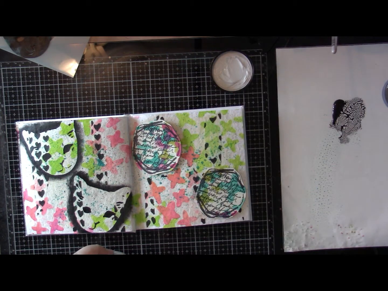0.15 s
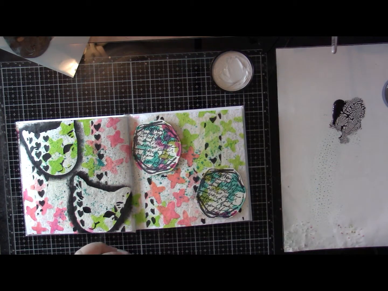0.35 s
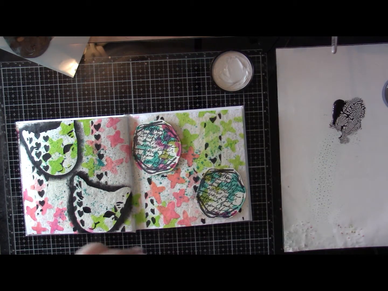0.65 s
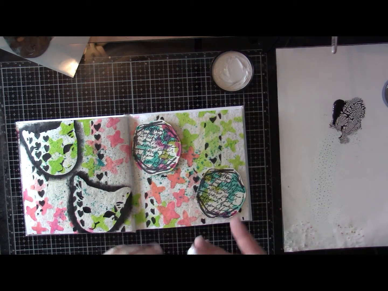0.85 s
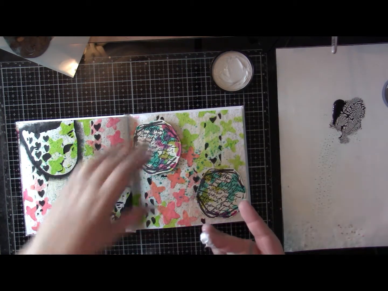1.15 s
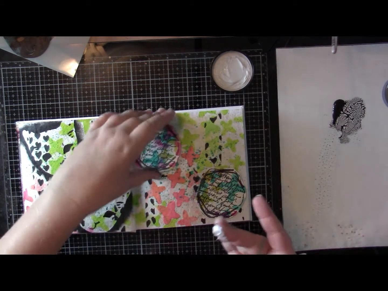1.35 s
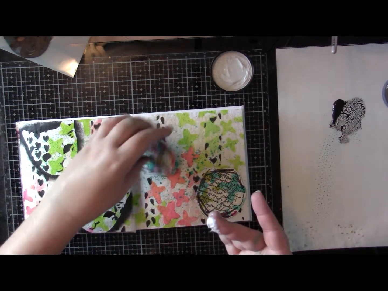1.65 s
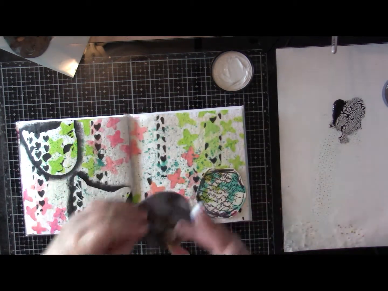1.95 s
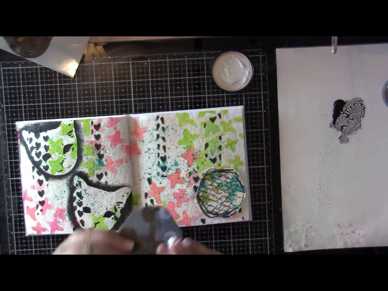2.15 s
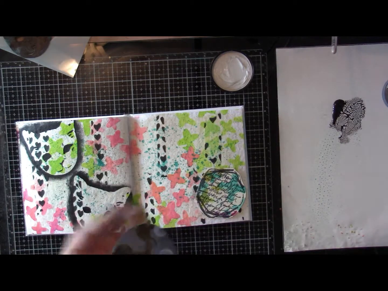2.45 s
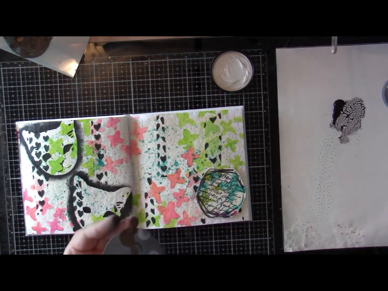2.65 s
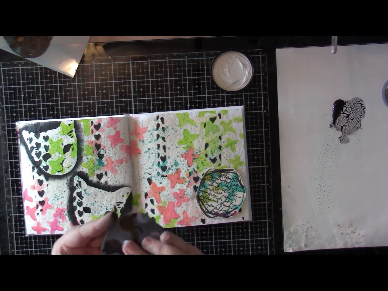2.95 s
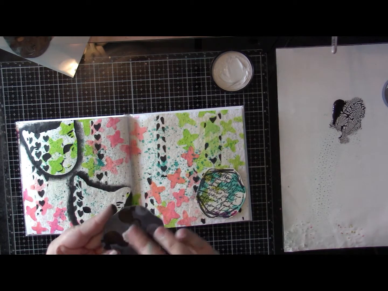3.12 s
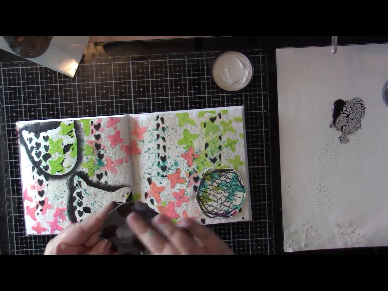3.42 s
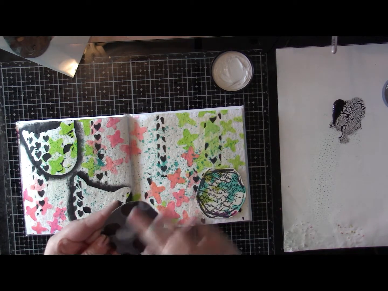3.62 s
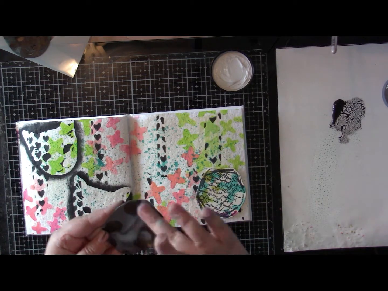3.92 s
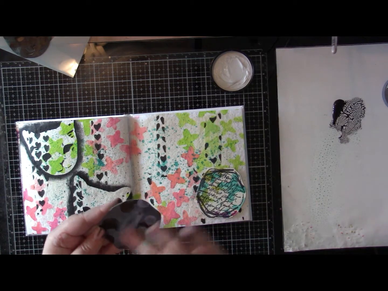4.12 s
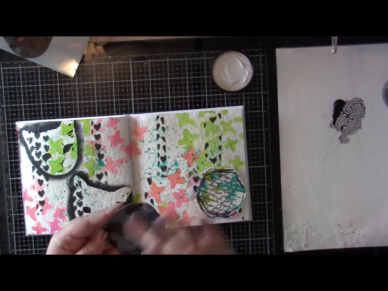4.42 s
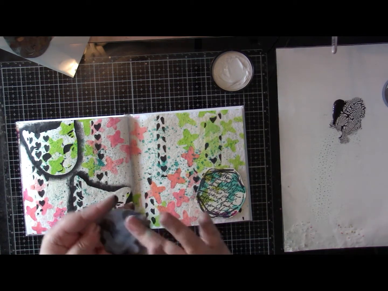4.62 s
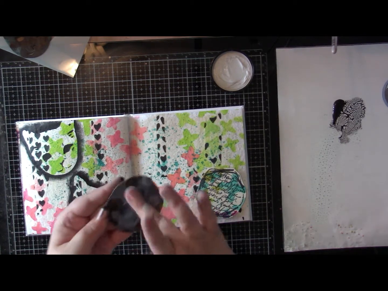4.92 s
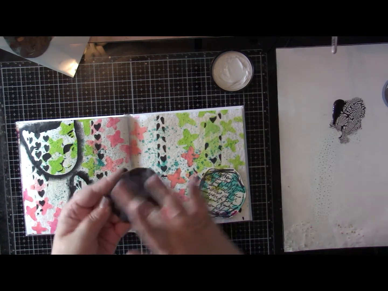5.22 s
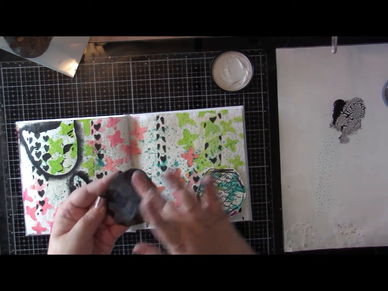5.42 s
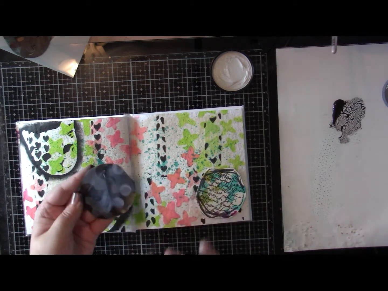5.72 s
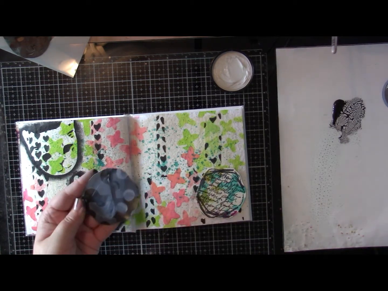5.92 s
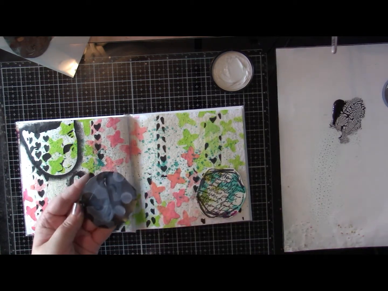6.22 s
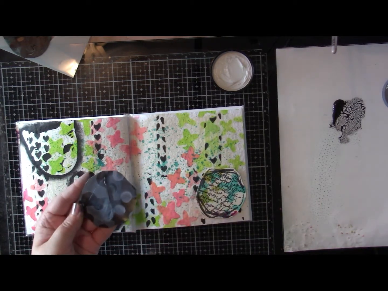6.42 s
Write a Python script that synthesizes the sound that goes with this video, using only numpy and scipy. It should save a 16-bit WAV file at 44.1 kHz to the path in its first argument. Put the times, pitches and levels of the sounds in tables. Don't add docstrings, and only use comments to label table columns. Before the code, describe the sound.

Close up at an indoor craft table: a faint click, two woody knocks with a light rattle, then the dry sticky crackle of card pulled from paper. A low page bump follows, with small ticks and soft papery scuffing. The disc pops loudly four times as it flexes under rubbing fingers. Handling fades to quiet room air before a dull final thump.

```python
import sys
import numpy as np
from scipy import signal
from scipy.fft import rfft, irfft
from scipy.io import wavfile

SR = 44100
rng = np.random.default_rng(int(sys.argv[2]) if len(sys.argv) > 2 else 0)


def wrap_up_sound(samples):
    columns = np.atleast_2d(samples).T
    tamed = np.clip(columns, -1, 1)
    steps = np.round(tamed * 32767).astype(np.int16)
    wavfile.write(sys.argv[1], SR, steps)


def elevation(decibels):
    levels = np.asarray(decibels, float)
    return 10 ** (levels / 20)


N = 289296

# (frequency [Hz], level [dB])
ROOM_COLOUR = [(150, -19), (400, -6), (750, 2), (1500, -1.5), (3000, -3.5), (6000, -2.5), (14000, -9)]


def at_hz(points, hz):
    table_hz, table_db = np.array(points)[:, 0], np.array(points)[:, 1]
    return np.interp(np.log(hz + 1), np.log(table_hz), table_db)


def rms_one(x):
    return x / np.sqrt(np.mean(x ** 2) + 1e-20)


def band(x, low_hz, high_hz):
    return signal.sosfilt(signal.butter(2, [low_hz, high_hz], "band", fs=SR, output="sos"), x)


def coloured(x, db_of):
    return irfft(rfft(x) * elevation(db_of(np.fft.rfftfreq(N, 1 / SR))), N)


def resonance(x, hz, width_hz):
    r = np.exp(-np.pi * width_hz / SR)
    poles = [1, -2 * r * np.cos(2 * np.pi * hz / SR), r * r]
    return signal.lfilter(np.array([1, 0, -1]) * (1 - r * r) / 2, poles, x)


def drift(rate_hz):
    r = np.exp(-2 * np.pi * rate_hz / SR)
    chance = rng.standard_normal(N + SR)
    return rms_one(signal.lfilter([1], [1, -2 * r, r * r], chance)[SR:])


def grains(per_s, spread_db):
    sizes = elevation(spread_db * np.minimum(rng.exponential(1, N), 5)) * rng.choice([-1, 1], N)
    return sizes * (rng.random(N) < per_s / SR) + 1e-18


def swell(t, rise_s):
    return (t / rise_s * np.exp(1 - t / rise_s)) ** 2


def add(out, s, sound):
    i = round(s * SR)
    out[i:i + len(sound)] += sound[:N - i]


def hush():
    # (frequency [Hz], level [dB per Hz])
    air_spectrum = [(18, -64.5), (30, -30), (59, -9), (131, -7.5), (161, -4.5), (355, -3), (473, -2),
                    (512, -7), (584, -5.5), (913, -12.5), (1670, -19.5), (2750, -21.5), (7000, -29),
                    (12000, -34.5), (14000, -40), (16000, -45)]
    # (time [s], level [dB])
    air_levels = [(0, -59.5), (1.06, -56.5), (2.76, -58), (3.84, -56.5), (4.0, -58.5), (6.3, -55.5),
                  (6.56, -58)]
    # (frequency [Hz], width [Hz], lift [dB])
    air_peaks = [(134.3, 12, 8.5), (313, 8.9, 8), (353, 78, 5), (508, 19.7, 4), (11100, 120, -5)]
    # (frequency [Hz], side minus mid [dB])
    side_levels = [(60, -12.5), (180, -13.5), (550, -12), (1650, -7), (4970, -13), (15000, -28)]

    def mid_db(hz):
        lift = sum(db / (1 + (2 * (hz - peak_hz) / width_hz) ** 2) for peak_hz, width_hz, db in air_peaks)
        return at_hz(air_spectrum, hz) + lift

    white = rng.standard_normal((2, N))
    mid = coloured(white[0], mid_db)
    side = coloured(white[1], lambda hz: mid_db(hz) + at_hz(side_levels, hz))
    both = (mid + side * [[1], [-1]]) / np.std(mid)
    air_db = np.interp(np.arange(N) / SR, *np.transpose(air_levels))
    low = signal.sosfilt(signal.butter(1, 900, fs=SR, output="sos"), both)
    return elevation(air_db + 0.5) * low + elevation(-53.5) * (both - low)


def room(x):
    # (frequency [Hz], t60 [s])
    decay_times = [(150, 0.22), (500, 0.21), (1400, .32), (3700, 0.27), (9000, 0.36), (15000, 0.073)]
    # (frequency [Hz], level re diffuse tail [dB], t60 [s])
    standing_waves = [(603, -21, 0.2), (735, -12, 0.17)]
    first_echo_s, side_db = 0.0047, -19.5
    t = np.arange(SR // 2) / SR
    edges_hz = 90 * 2 ** np.arange(0, 7.6, .5)
    white, tail = rng.standard_normal((2, 2, SR // 2)), 0
    for k, (low_hz, high_hz) in enumerate(zip(edges_hz, edges_hz[1:])):
        hz = np.sqrt(low_hz * high_hz)
        decay = elevation(at_hz(ROOM_COLOUR, hz) - 60 * t / at_hz(decay_times, hz))
        tail = tail + band(white[k % 2], low_hz, high_hz) * decay
    tail[0] += sum(elevation(db - 60 * t / t60) * np.sin(2 * np.pi * hz * t) for hz, db, t60 in standing_waves)
    tail = tail * np.clip((t - first_echo_s) / 0.0013, .12, 1)
    mid, side = signal.fftconvolve(x[None], tail, axes=1)[:, :N]
    return mid + elevation(side_db) * (side + 1.2 * band(side, 1200, 9000)) * [[1], [-1]]


def thumps():
    # (time of top [s], level [dB], frequency [Hz], rise [s])
    hand_weights = [
        (0.711, -17, 300, .004),
        (0.729, -20, 330, .004),
        (1.006, -43, 350, .004),
        (1.902, -46, 520, .003),
        (2.0735, -26, 330, .0022),
        (6.28, -46, 250, .006),
        (6.353, -35, 240, .004),
        (6.36, -27, 230, .004),
    ]
    out, t = np.zeros(N), np.arange(2048) / SR
    for s, db, hz, rise_s in hand_weights:
        add(out, s - rise_s, elevation(db) * np.sin(2 * np.pi * hz * t) * swell(t, rise_s))
    return out


def snaps():
    # (time [s], peak [dB], body frequency [Hz], hardness: edge re body [dB])
    landings = [
        (1.361, -36, 1100, -17),
        (1.558, -33, 930, -15),
        (2.259, -44, 676, -19),
        (4.652, -43, 430, -11.5),
        (4.97, -31, 440, -30),
        (5.204, -37, 566, -23.5),
        (5.673, -43, 577, -22),
        (6.266, -39, 640, -28),
    ]
    # (time [s], peak [dB], edge [Hz], body [Hz], breadth: body and air beside the edge [dB])
    buckles = [(1.627, -40, 4000, 1170, 0), (1.732, -36, 2000, 1140, -5), (1.949, -50.5, 2820, 603, 4),
               (1.988, -37, 2300, 444, 1), (2.008, -39.5, 3650, 483, 1.5), (2.035, -50, 2100, 590, 0),
               (2.054, -48, 2130, 1140, -10), (2.065, -43, 2420, 404, -3), (2.0705, -34, 2620, 400, 2),
               (2.187, -47, 3070, 476, -11), (2.527, -55, 3220, 409, 1), (2.715, -45, 1720, 570, 1),
               (2.718, -41, 2120, 1470, 2), (2.721, -45, 2030, 380, 6), (2.918, -56, 3360, 596, -2),
               (2.975, -35.5, 3400, 950, -12), (3.2347, -38.5, 3720, 700, -21), (3.961, -48, 2700, 694, -2),
               (4.384, -56, 2690, 474, 0), (4.784, -48, 2820, 420, -2)]
    # (time [s], level [dB])
    dry_ticks = [
        (0.251, -31),
        (6.308, -47),
        (6.465, -50),
    ]
    # time, body dB, body Hz, edge Hz, edge dB, air dB
    rows = [(s, db, hz, 2750, db + hard, db + hard - 2) for s, db, hz, hard in landings]
    rows += [(s, db + 2 + broad, body_hz, edge_hz, db, db - 2.5 + broad)
             for s, db, edge_hz, body_hz, broad in buckles]
    rows += [(s, db - 43, 487, 4630, db - 41, db) for s, db in dry_ticks]
    out, t = np.zeros(N), np.arange(1024) / SR
    noise = rng.standard_normal((len(rows), 3, 1024))
    for (s, body_db, body_hz, edge_hz, edge_db, air_db), (a, b, c) in zip(rows, noise):
        body = np.sin(2 * np.pi * body_hz * t) + 0.47 * rms_one(band(a, body_hz, 2 * body_hz))
        edge = np.sin(2 * np.pi * edge_hz * t) + 0.74 * rms_one(band(b, 1420, 4660))
        air = rms_one(band(c, 5800, 12000))
        add(out, s, elevation(body_db - 3.0) * body * swell(t, 0.0019)
            + elevation(edge_db + 2.5) * edge * swell(t, 0.0017)
            + elevation(air_db - 8.5) * air * swell(t, 0.000814))
    return out


def knocks():
    # (time [s], crack peak [dB], boom [dB], bright edge [dB], deep modes re boom [dB])
    blows = [
        (0.701, -15.5, -21, -16, 0.5),
        (0.82, -20, -29.5, -60, -0.5),
        (1.002, -39, -49.5, -38, 0),
        (1.015, -32, -69, -30.5, -1),
        (6.344, -29, -32, -27, 5),
    ]
    # (frequency [Hz], level [dB], t60 [s])
    table_modes = [(90.6, -15, 0.22), (104, -34, 0.79), (139.5, -5.5, 0.18), (180.8, -13, 0.4),
                   (229, -9.5, 0.37), (245, 10.5, 0.078), (299, 1.5, 0.27), (324, -1, 0.13),
                   (353.5, 3.5, 0.15), (406, -7, 0.26), (535, 3.5, 0.085), (582, -6, 0.12),
                   (670, -3.5, 0.075), (715, -19, 0.15), (796, -14, 0.16), (993, -7, 0.093),
                   (1090, 2, 0.08), (1440, -15, 0.17)]
    out, boom = np.zeros(N), np.zeros(N)
    t, long = np.arange(2048) / SR, np.arange(SR // 2) / SR
    noise = rng.standard_normal((len(blows), 2, 2048))
    chance = rng.standard_normal((len(blows), len(table_modes), 2))
    touch = 1 - np.exp(-t / 0.00044)
    for (s, crack_db, boom_db, bright_db, deep_db), (dull, bright), draws in zip(blows, noise, chance):
        rattle = rms_one(band(band(dull, 360, 2010), 410, 5200)) * touch * np.exp(-t / 0.0057)
        thud = np.sin(2 * np.pi * 750 * t) * swell(t, .0007) + .5 * rattle
        edge = rms_one(band(bright, 1670, 5060)) * touch * np.exp(-t / 0.0046)
        air = rms_one(band(bright, 2800, 9900)) * touch * np.exp(-t / 0.0027)
        add(out, s, elevation(crack_db + 1) * thud + elevation(bright_db - 8.0) * edge + elevation(crack_db - 29) * air)
        loose = rms_one(band(rng.standard_normal(len(long)), 187, 456))
        shake = elevation(-60 * long / 0.23) * (1 - np.exp(-long / 0.0026))
        add(boom, s + 0.00401, elevation(boom_db - 4.0) * loose * shake)
        for (hz, level_db, t60), (strong, phase) in zip(table_modes, draws):
            decay = elevation(-60 * long / t60) * (1 - np.exp(-long / 0.0032))
            ring = np.sin(2 * np.pi * hz * long + 0.46 * phase) * decay
            mode_db = boom_db + level_db - 3.5 + 3.24 * strong + deep_db * (hz < 200)
            add(boom, s + .006, elevation(mode_db) * ring)
    return out, band(boom, 91, 4200)


def cracks():
    breaks = [
        (3.2386, -16, [(650, 345, 1), (1440, 350, -19), (2110, 350, -13), (3450, 430, -19), (6150, 500, -55), (8450, 2500, -61)]),
        (4.4275, -14, [(636, 400, 0.5), (920, 280, -8.5), (1230, 386, -7), (1700, 300, -7.5), (2895, 400, 3.5), (3620, 350, -3.5), (4730, 700, -6), (5940, 400, -24), (9860, 2100, -20.5)]),
        (5.0892, -26, [(373, 323, -2.5), (595, 414, 1), (980, 530, 0), (1730, 400, -6.5), (2880, 400, -12), (3500, 354, -13), (4800, 500, -35), (8770, 2000, -45)]),
        (5.3400, -12.5, [(617, 474, -4), (965, 410, -6), (1530, 350, -12.5), (2110, 380, -19), (3074, 420, 0), (4570, 410, -11.5), (6700, 360, -20.5), (9400, 1300, -33)]),
    ]
    treble_levels = [-46, -21, -38, -31]
    wall_shares = [-34, -31.5, -33, -35.5]
    # (frequency [Hz], level [dB per Hz])
    wall_colours = [
        [(150, -57), (250, -26), (760, 1.5), (921, -23), (1490, -10), (1700, -30), (2040, -16.5), (2750, -32),
         (3400, -42), (9000, -49), (11700, -79), (19800, -120)],
        [(150, -54), (250, -19), (357, -20), (420, -7.5), (600, -1), (800, -3), (1000, -11.5), (1800, -11),
         (2190, -18.5), (3030, -8), (5000, -16), (12000, -45), (15600, -75.5), (22000, -120)],
        [(150, -39), (250, -8.5), (818, -2), (1530, -9), (1760, -2.5), (2430, -22), (2950, -13), (3690, -29),
         (7000, -31.5), (9100, -64), (15400, -120)],
        [(150, -55), (250, -24), (609, -3), (1280, -14.5), (1500, -6), (2700, -14), (3080, -8.5), (3990, -18.5),
         (4920, -17), (12000, -48), (15600, -79), (22000, -120)],
    ]
    fill_db = -14
    out, walls, t = np.zeros(N), np.zeros(N), np.arange(1024) / SR
    bins_hz = np.fft.rfftfreq(512, 1 / SR)
    for (s, level_db, modes), air_db, wall_db, colour in zip(breaks, treble_levels, wall_shares, wall_colours):
        rough = rng.standard_normal((len(modes), 1024))
        for (hz, width_hz, db), noise in zip(modes, rough):
            rise_s = .55 / min(width_hz, 600)
            grit = rms_one(resonance(resonance(noise, hz, width_hz), hz, 2 * width_hz))
            ring = np.sin(2 * np.pi * hz * t + 3 * noise[0]) + 0.42 * grit
            add(out, s - rise_s, elevation(level_db + db) * 0.0016 / rise_s * ring * swell(t, rise_s))
        air = elevation(level_db + air_db) * rms_one(band(rough[0], 6000, 13500))
        fill = elevation(level_db + fill_db + .4 * (air_db + 28)) * rms_one(band(rough[1], 700, 3000))
        add(out, s - .0011, swell(t, .0012) * (air + fill))
        pulse = irfft(elevation(at_hz(colour, bins_hz) - at_hz(ROOM_COLOUR, bins_hz)))
        pulse = np.roll(pulse, 256) * np.hanning(512)
        add(walls, s - 256 / SR, elevation(level_db + wall_db + 19.0) * pulse / np.linalg.norm(pulse))
    return band(out, 224, 15500), walls


def peeling():
    # (time of top [s], level [dB], rise and fall by 20 dB [s], disc ring [Hz])
    clumps = [(1.539, -50, .008, 3700), (1.562, -50, .015, 5400), (1.582, -43, .02, 4230),
              (1.595, -41, .02, 3030), (1.606, -40, .016, 4200), (1.615, -36, .0055, 3000),
              (1.631, -32, .006, 4000), (1.641, -36, .012, 3900), (1.649, -37, .008, 3700),
              (1.660, -45, .012, 3000), (1.680, -46, .025, 2600), (1.705, -52, .03, 2800),
              (1.720, -45, .012, 2820), (1.730, -38, .008, 3660), (1.735, -30, .011, 2000),
              (1.750, -46, .022, 2500), (1.778, -50, .04, 2200), (1.81, -62, .05, 2200)]
    # (time of top [s], level [dB], rise and fall by 20 dB [s], ring [Hz])
    flexes = [
        (1.575, -53, .025, 800),
        (1.595, -50, .015, 1250),
        (1.642, -42, .012, 1050),
        (1.657, -40, .009, 1200),
        (1.665, -33, .011, 1300),
        (1.680, -42, .018, 650),
        (1.727, -50, .012, 1150),
        (1.739, -45, .014, 950),
        (1.755, -48, .02, 750),
    ]
    # (frequency [Hz], level [dB])
    stiff_modes = [(2100, -6), (3030, 0), (4050, 0), (5400, -2), (6800, -6)]
    t, out = np.arange(N) / SR, np.zeros(N)
    slips = grains(per_s=6000, spread_db=1.8)
    disc = rms_one(sum(elevation(db + 2.1 * drift(40)) * (-1) ** k * resonance(slips, hz, hz / 12)
                       for k, (hz, db) in enumerate(stiff_modes)))
    fizz = rms_one(band(slips, 5000, 10500))
    page = rms_one(band(slips, 450, 2400))
    for rows, stiff, q in [(clumps, 1, 9), (flexes, 0, 4)]:
        for s, db, span_s, hz in rows:
            now = slice(round((s - .1) * SR), round((s + .2) * SR))
            side_s = np.where(t[now] < s, .8 * span_s, 1.2 * span_s)
            clump = elevation(db + .3 - 20 * np.abs(t[now] - s) / side_s)
            ring = rms_one(resonance(resonance(slips[now], hz, hz / q), hz, 2 * hz / q))
            stiff_part = stiff * (.7 * disc[now] + elevation(-9) * fizz[now])
            out[now] += clump * (ring * (1 - .3 * stiff) + stiff_part + .25 * page[now])
    return out


def rubbing():
    # (frequency [Hz], level [dB per Hz])
    hiss_spectrum = [(1180, -44.5), (2000, -54.5), (2810, -0.5), (3740, -1), (9170, -3), (12000, -8),
                     (14000, -16), (16000, -30)]
    # (frequency [Hz], width [Hz], level [dB])
    disc_modes = [(2300, 1170, 4), (2820, 180, 2), (3400, 700, -6.5), (4305, 410, 7.5), (5600, 850, -11)]
    # (start [s], length [s], hiss [dB], disc ring re hiss [dB])
    strokes = [(2.448, 0.071, -64, 2.5), (2.581, 0.11, -62.5, 3), (2.79, 0.09, -64, 4),
               (2.911, 0.066, -60.5, 10), (3.03, .08, -69, 1.5), (3.14, 0.04, -64, 2),
               (3.326, 0.044, -64, 2), (3.382, 0.066, -63.5, 2), (3.53, 0.037, -66.5, -5),
               (3.567, 0.042, -59.5, 2.5), (3.65, 0.11, -66, 2), (3.791, 0.09, -60.5, 1),
               (3.975, 0.03, -69, -3), (4.078, 0.074, -60.5, 3), (4.16, .04, -70, 6),
               (4.214, 0.075, -62, -4), (4.378, 0.097, -63.5, -6), (4.522, 0.032, -52.5, 6),
               (4.693, 0.053, -71, 10), (4.78, 0.056, -63, 7.5), (4.922, 0.058, -63.5, -4),
               (5.031, 0.042, -67.5, 0), (5.16, 0.07, -61, -10), (5.272, 0.068, -69, -2),
               (5.428, 0.096, -60.5, 0.5), (5.58, 0.06, -71.5, -11)]
    # (start [s], length [s], hiss [dB], ring re hiss [dB])
    slides = [(0.992, 0.11, -67, 11.5), (1.263, 0.14, -68, 6.5), (1.896, 0.078, -59, 5.5),
              (1.978, 0.058, -60, 6.5), (2.045, 0.039, -62, -8), (2.268, 0.036, -57, 12.5),
              (2.304, 0.052, -65, -19), (2.71, 0.017, -54.5, -5), (2.964, 0.019, -57.5, 11.5),
              (5.72, 0.15, -67.5, -3), (5.87, .2, -76, -1)]
    # (time [s], frequency [Hz])
    grip = [(1.9, 2750), (2.0, 3500), (2.1, 2400), (2.3, 3020), (2.46, 2320), (2.58, 3230), (3.2, 3400),
            (3.4, 4550), (3.56, 2680), (4.1, 2850), (4.8, 2980), (5.5, 3210)]
    land_s, lift_s = .013, 0.0065
    arch = 0.55
    drag_db, drag_s, drag_ring_db = -9.5, 0.049, 3

    slips = grains(per_s=4500, spread_db=2.2) * elevation(1.1 * drift(62.3))
    hiss = rms_one(coloured(slips, lambda hz: at_hz(hiss_spectrum, hz)))
    centres_hz = np.geomspace(2200, 16000, num=9)
    patches = 0
    for mid_hz in centres_hz:
        def patch_db(hz):
            return 20 * np.log10(np.interp(hz, centres_hz, centres_hz == mid_hz) + 1e-9)
        patches = patches + coloured(hiss, patch_db) * elevation(2.2 * drift(25))
    hiss = rms_one(patches)
    disc = rms_one(sum(elevation(db + 2.1 * drift(32)) * (-1) ** k
                       * resonance(resonance(slips, hz, width_hz), hz, 2 * width_hz)
                       for k, (hz, width_hz, db) in enumerate(disc_modes)))

    moves = list(strokes) + list(slides)
    out, fibre_hz = np.zeros(N), rng.uniform([5500, 9500], [7500, 11500], (len(moves), 2))
    for (s, length_s, hiss_db, ring_db), (early_hz, late_hz) in zip(moves, fibre_hz):
        t = np.arange(round((length_s + 0.15) * SR)) / SR
        along, after = np.clip(t / length_s, 0, 1), np.maximum(t - length_s, 0)
        pressure = np.clip(t / land_s, 0, 1) ** 2 * (1 - arch + arch * np.sin(np.pi * along ** 1.4))
        pressure = pressure * np.exp(-after / lift_s)
        drag = elevation(drag_db) * along ** 2 * np.exp(-after / drag_s)
        first = round((s - .006) * SR)
        now = slice(first, first + len(t))
        free_hz = np.interp(s, *np.transpose(grip))
        free = rms_one(resonance(resonance(slips[now], free_hz, 200), free_hz, 350))
        tint = (1 - along) * resonance(hiss[now], early_hz, 2197) + along * resonance(hiss[now], late_hz, 2490)
        fibres = 0.74 * hiss[now] + 0.6 * tint
        ring = elevation(ring_db - 6.5) * (disc[now] + 0.5 * free)
        rub = (pressure + drag) * fibres + (pressure + elevation(drag_ring_db) * drag) * ring
        add(out, s - .006, elevation(hiss_db + 3.2) * rub)
    return out


def scene():
    contact, boom = knocks()
    crack, crack_walls = cracks()
    taps, paper = snaps() + contact, rubbing() + peeling()
    direct = taps + boom + thumps() + crack + paper
    scatter = rng.standard_normal(200) * np.exp(-np.arange(200) / 8.)
    scatter = scatter / np.linalg.norm(scatter)
    apart = band(signal.fftconvolve(taps + crack + .6 * paper, scatter)[:N], 800, 15500)
    apart = apart + 1.6 * band(apart, 8000, 15500)
    towards_walls = elevation(-33) * taps + elevation(-37) * boom + crack_walls + elevation(-37.0) * paper
    return direct + elevation(-25.5) * apart * [[-1], [1]] + room(towards_walls) + hush()


def band_limit(x):
    return signal.sosfilt(signal.butter(12, 16470, fs=SR, output="sos"), x)


def record(dry):
    top_edge = signal.ellip(12, .1, 60, 15350 + 100, fs=SR, output="sos")
    mix = signal.sosfilt(top_edge, dry)
    return band_limit(mix)


dry = scene()
out = record(dry)
wrap_up_sound(out)
```